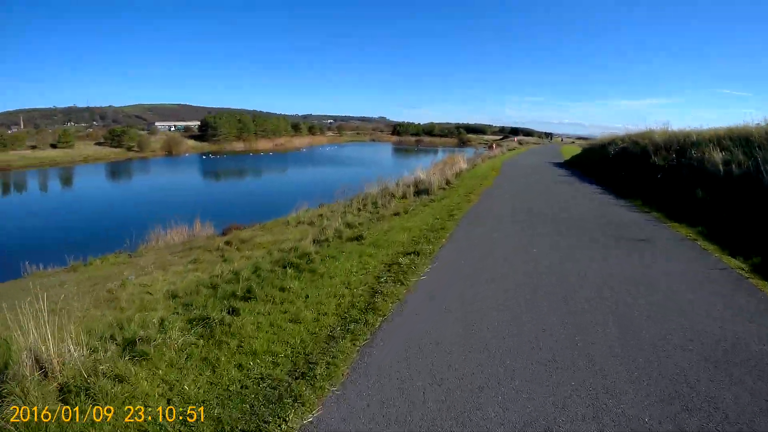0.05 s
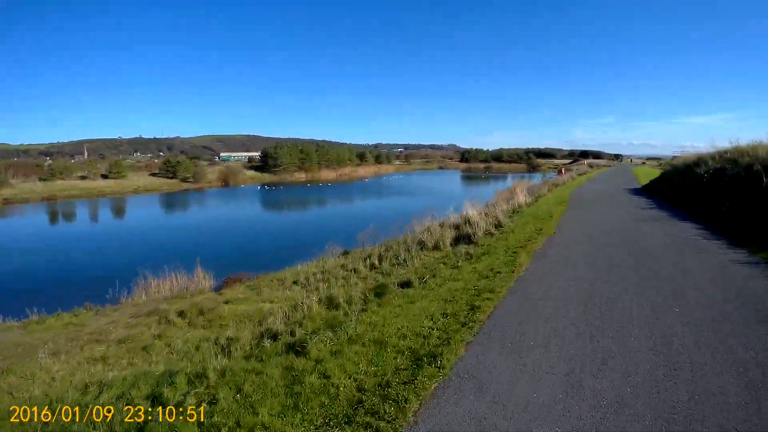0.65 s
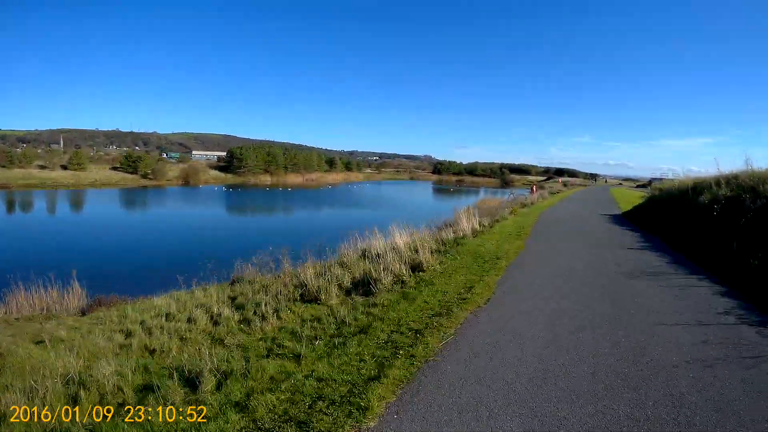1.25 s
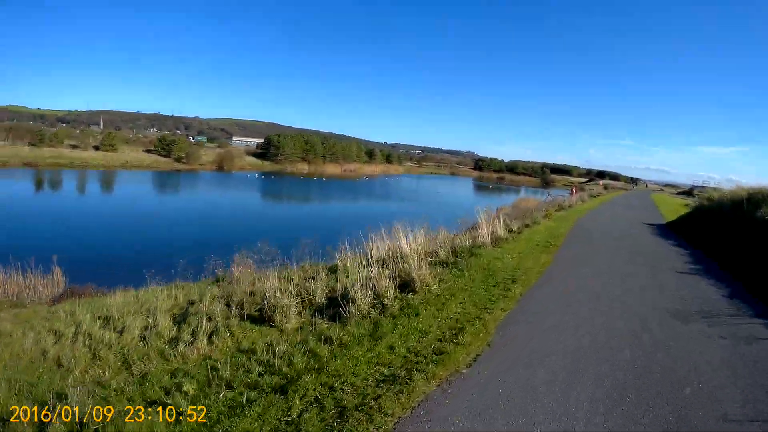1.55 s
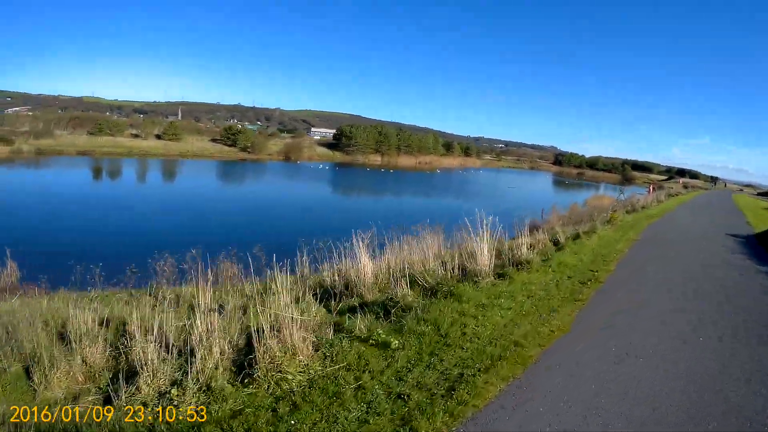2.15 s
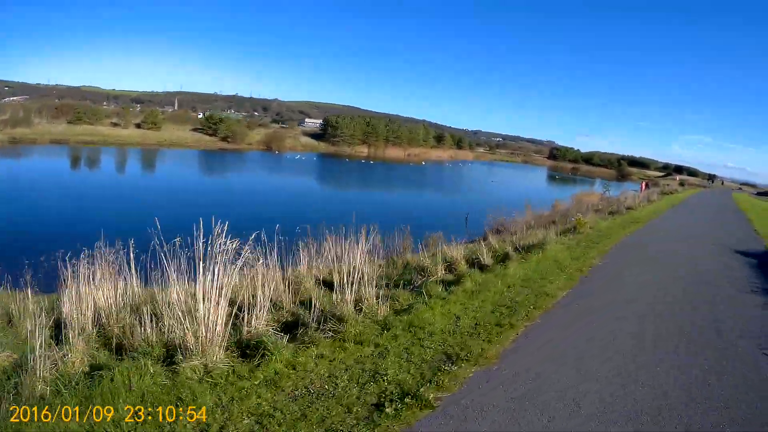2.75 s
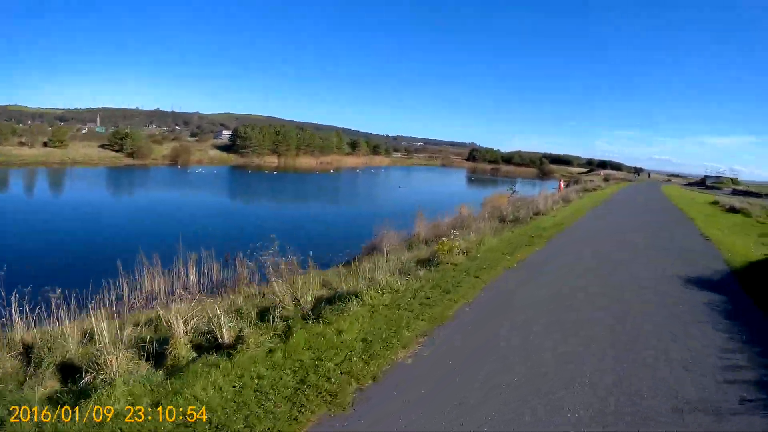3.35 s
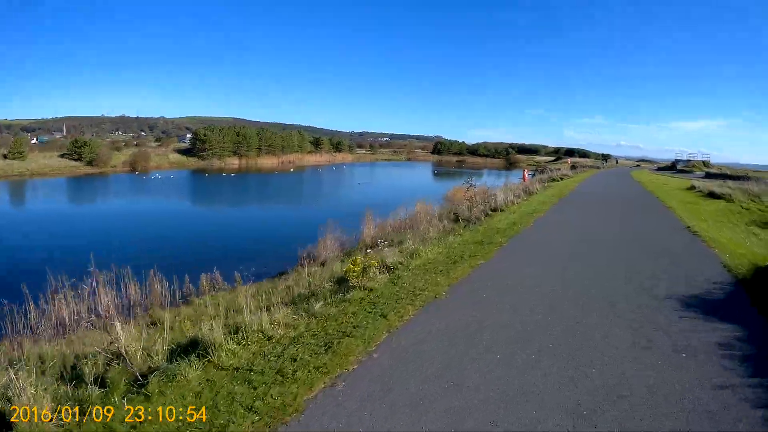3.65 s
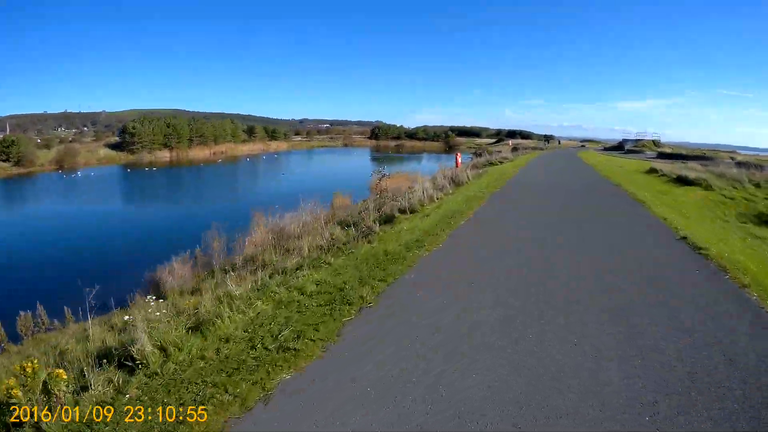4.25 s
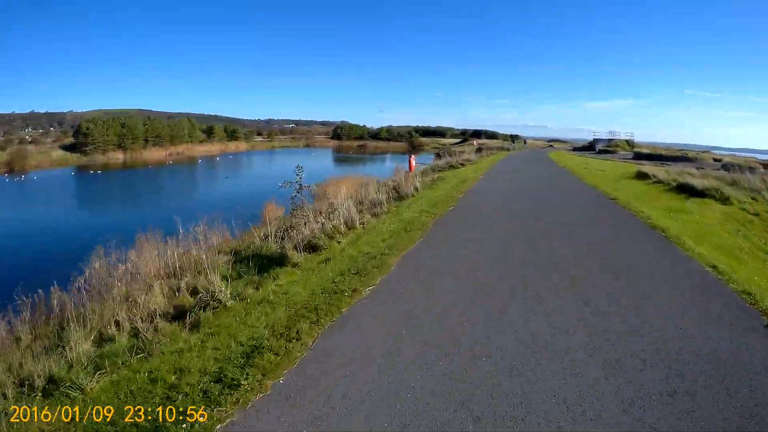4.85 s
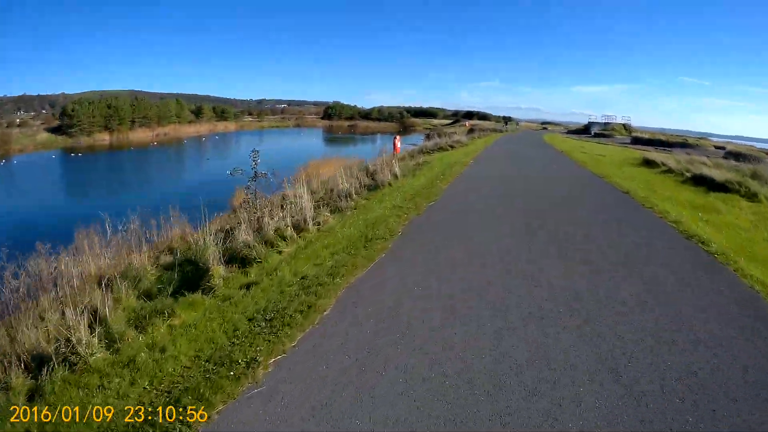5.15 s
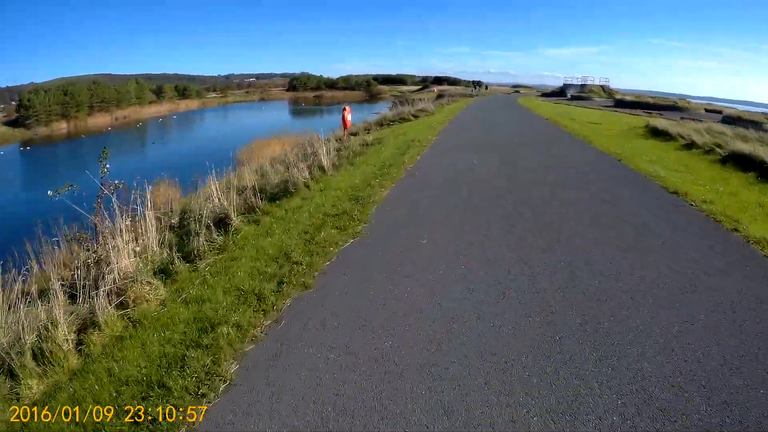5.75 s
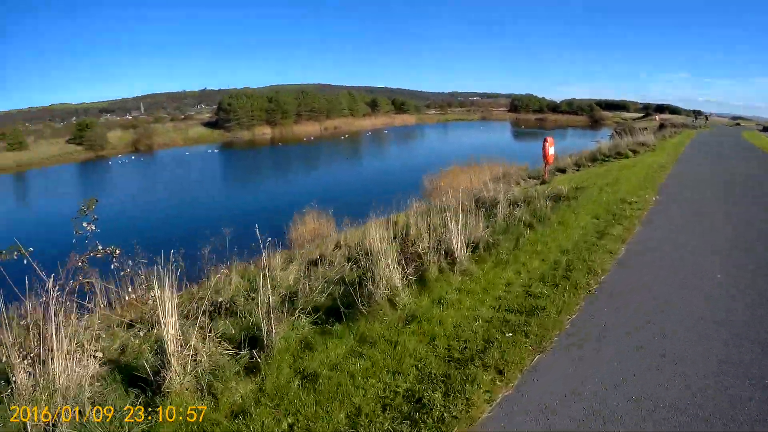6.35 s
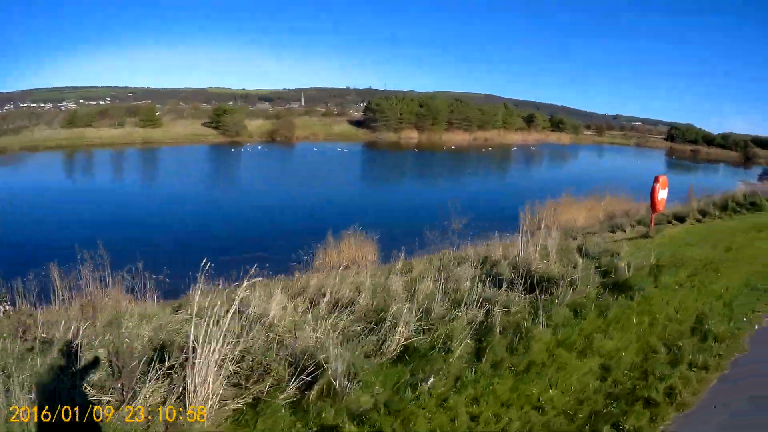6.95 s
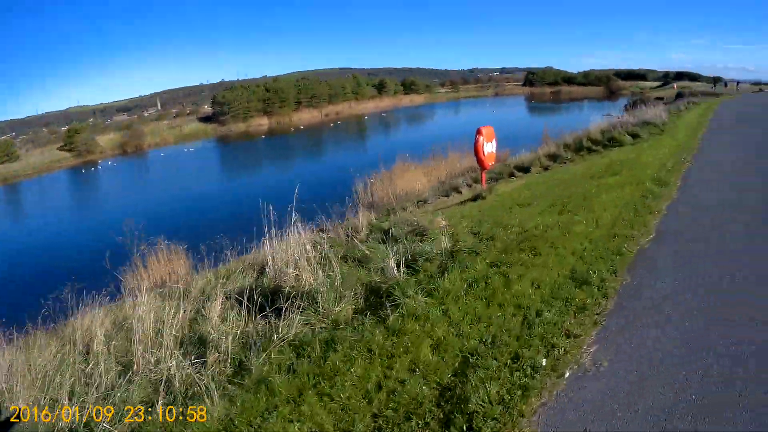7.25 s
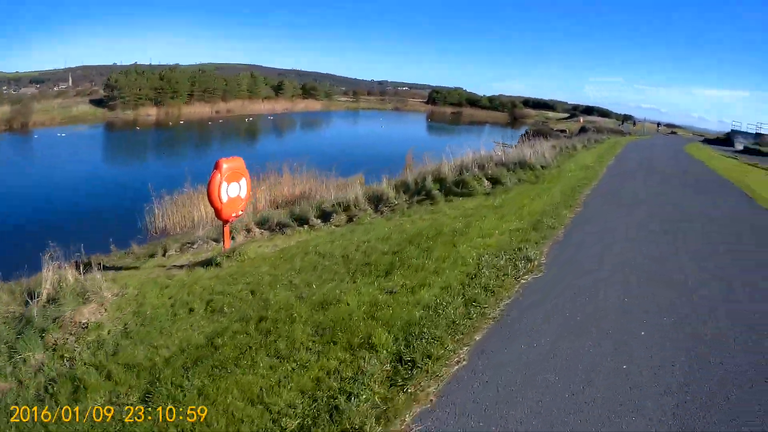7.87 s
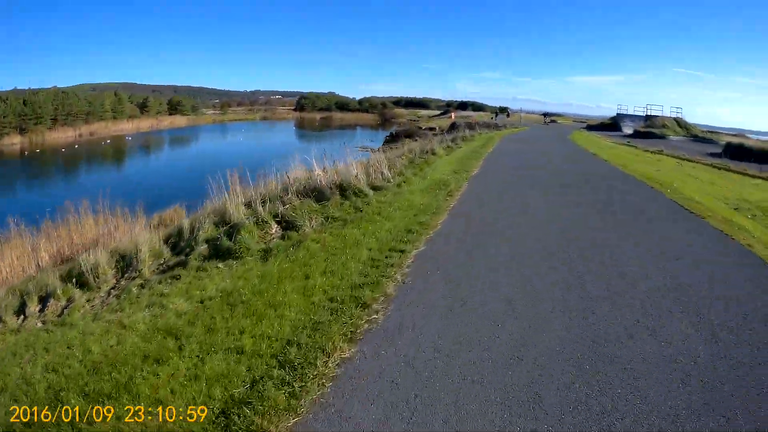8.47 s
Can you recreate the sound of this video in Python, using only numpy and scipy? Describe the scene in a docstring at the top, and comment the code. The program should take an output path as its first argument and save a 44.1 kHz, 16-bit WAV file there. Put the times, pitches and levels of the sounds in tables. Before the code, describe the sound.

Gusty headwind rumbles and thumps on a handheld microphone as an electric skateboard rolls along a paved path in the open. The buffeting is strongest about two to three seconds in and again around seven seconds, with lighter air between and at the close. Underneath, the wheels keep an even roar and thin hiss on the asphalt, with a faint ringing from the drive and occasional small ticks of flicked grit.

```python
"""An electric skateboard cruises along asphalt, heard at a microphone in the rider's hand.
Random impacts of the wheels on stones excite the deck into a steady roar and the treads into a hiss.
The drive and trucks ring faintly at their resonances, and flicked grit ticks.
Gusts of headwind carry eddies past the microphone: their pressure makes a rumble that brightens
as it strengthens, and single large vortices thump."""
import sys
import numpy as np
from scipy import signal
from scipy.fft import rfft, irfft, next_fast_len
from scipy.io import wavfile
from scipy.ndimage import uniform_filter1d

SR = 44100
rng = np.random.default_rng(int(sys.argv[2]) if len(sys.argv) > 2 else 0)


def materialize(psi):
    """Save the field psi as 16-bit PCM at rate SR to the path in sys.argv[1].

    A 1-D psi becomes a single channel; in a 2-D psi each row is a channel.
    """
    bounded = np.clip(np.atleast_2d(psi).T, -1, 1)
    quanta = np.round(bounded * 32767).astype(np.int16)
    wavfile.write(sys.argv[1], SR, quanta)


N = 384111
TIME = np.arange(N) / SR

# Spectra of the wheels and deck, and of the treads on asphalt: frequency_hz, relative_density_db
ROAR_SPECTRUM = [(30, -11.5), (120, -8), (290, -1.5), (400, 1), (530, -0.5), (590, -10), (640, -10),
                 (690, -9.5), (740, -9), (850, -11), (1000, -11), (1095, -13), (1170, -28), (1500, -24),
                 (1950, -25), (2400, -36), (3300, -65.5)]
HISS_SPECTRUM = [(1000, -13), (2200, -0.5), (2850, 1), (3300, -3.5), (3700, 2), (4200, -1), (4500, 0),
                 (4850, -4), (5200, -6), (5900, -12.5), (6600, -12), (7100, -17), (7900, -15.5),
                 (8700, -20), (12500, -20.5), (14500, -30)]
# Hiss as the microphone turns toward and away from the wheels: time_s, base_level_db, treble_lift_db
HISS_CONTOUR = [(0, -68.5, -1.5), (1.6, -69, -3.5), (2.6, -70, -2), (4.3, -69, -1.5), (6.4, -69.3, 0.5),
                (7.3, -69, 2), (7.9, -69.5, 2), (8.71, -68.5, 1)]
# Resonances of the drive and trucks: pitch_hz, width_hz, level_db
DRIVE_MODES = [(468, 35, -59), (931.5, 38, -60.5), (1744, 90, -70.5)]
# Grit flicked by the wheels: start_s, relative_peak_db, low_hz, high_hz
GRIT_TICKS = [(.553, -50.5, 2600, 4900), (1.295, -60, 2200, 5000), (2.394, -56.5, 3800, 7600),
              (2.629, -58, 2800, 6100), (2.709, -62, 3500, 8000), (4.422, -59, 3780, 13000),
              (4.495, -63, 4000, 8400), (5.219, -58, 3900, 5500), (6.1102, -67, 9500, 12800),
              (6.111, -44, 1000, 2900), (8.412, -57, 2410, 4500)]

# Headwind, varying with the breeze and the microphone's heading: time_s, strength_db
HEADWIND_CONTOUR = [(0, -36.5), (.18, -40), (.61, -31), (.87, -40.5), (1.46, -35.5), (1.65, -38),
                    (1.97, -29.5), (2.9, -29), (2.96, -33), (3.84, -33), (4.2, -40), (4.66, -35),
                    (4.84, -40.5), (6.25, -42), (6.8, -26.5), (7.15, -29), (7.34, -34), (7.6, -34.5),
                    (8.1, -41), (8.71, -43)]
# Short gusts on top of it: start_s, length_s, strength_db, extra_turbulence_db
WIND_GUSTS = [(0.285, 0.18, -32.5, -1), (0.406, 0.065, -26.5, -3.5), (0.568, .03, -31.5, 2.5),
              (0.766, 0.029, -30.5, -4), (0.982, 0.08, -35.5, -2), (1.176, 0.13, -31.5, -0.5),
              (1.477, 0.14, -32, -0.5), (1.874, 0.046, -26, -4), (2.247, 0.039, -27.5, -4),
              (2.42, 0.071, -28, -6), (2.562, 0.12, -30, 0.5), (2.72, 0.046, -26, 1), (2.77, 0.076, -27, 0),
              (3.083, 0.094, -28, -0.5), (3.165, 0.081, -28, -3.5), (3.258, 0.12, -44, 4),
              (3.695, 0.057, -30.5, -4), (3.886, 0.069, -31, -11), (4.287, 0.098, -34, -6),
              (4.443, 0.071, -32.5, -6), (4.59, 0.076, -32.5, -2), (4.707, 0.1, -33, -3.5),
              (4.94, 0.04, -40, -12), (5.865, 0.11, -38, -10), (6.047, 0.13, -35.5, -1.5),
              (6.444, 0.041, -29, -1), (6.538, 0.12, -34.5, -0.5), (6.745, 0.022, -29, -0.5),
              (6.987, 0.036, -35, 3.5), (7.074, 0.096, -28, -1.5), (7.177, 0.1, -36.5, 2),
              (7.426, 0.064, -27.5, -4), (7.533, 0.084, -33.5, -4), (7.776, 0.22, -40, 0.5)]
# Spectra of slow eddies, fast eddies, fine turbulence and vortex puffs: frequency_hz, relative_density_db
LIGHT_AIR_SPECTRUM = [(8, -16.5), (22, -2), (55, 0), (115, -3), (180, -9), (300, -17.5), (500, -29.5),
                      (1000, -39), (3000, -79.5)]
HARD_GUST_SPECTRUM = [(8, -28), (22, -5), (60, 2), (110, 2), (150, -4.5), (200, -4.5), (300, -11.5),
                      (500, -20.5), (1000, -37), (2000, -67.5), (5000, -93.5)]
TURBULENCE_SPECTRUM = [(80, -21), (250, -4.5), (480, -3.5), (700, -6.5), (1100, -11.5), (1700, -16.5),
                       (2500, -29.5), (3500, -41.5), (6000, -58.5), (12000, -81)]
PUFF_SPECTRUM = [(150, -10), (450, 5), (1000, -6.5), (1700, -13), (2600, -32), (5000, -58), (10000, -85.5)]
# Large eddies striking the microphone: centre_s, relative_peak_db, half_width_s, puff_level_db
VORTICES = [(0.592, -13.5, 0.0036, -49), (0.648, -16, 0.0035, -55), (1.89, -14.5, 0.0015, -51),
            (1.918, -14, 0.0018, -37), (1.961, -17.5, .0018, -45), (2.024, -14.5, 0.0017, -45),
            (2.078, -12.5, 0.0011, -46), (2.264, -16.5, 0.0012, -37), (2.268, -13, 0.0014, -36),
            (2.28, -16.5, 0.0014, -45), (2.442, -22, 0.0008, -35), (2.456, -19.5, 0.0031, -48),
            (2.673, -11.5, 0.0016, -45), (2.733, -17, 0.0013, -35), (3.104, -13, 0.0019, -38),
            (3.125, -17.5, 0.0012, -35.5), (3.146, -13, 0.0011, -41), (3.308, -16.5, .0025, -56),
            (3.447, -17.5, 0.0026, -45), (4.609, -15, 0.0026, -49), (6.075, -20.5, .0016, -52),
            (6.091, -22.5, 0.00091, -46), (6.958, -14, 0.0014, -40), (7.008, -14.5, 0.002, -54),
            (7.107, -15.5, 0.0031, -45), (7.245, -18, 0.00066, -37)]


def wheel_roar(level_db=-43.5):
    """Impact excitation: stones shake the wheels and deck; constant speed keeps the level steady."""
    return colour(stone_impacts(per_s=9000, spread_db=1.5), ROAR_SPECTRUM) * amp(level_db)


def tread_hiss(flicker_db=0.5, treble_hz=6100):
    """Directivity: the treads' contact noise changes in level and treble as the microphone turns."""
    base_db, lift_db = curves(HISS_CONTOUR)
    hiss = colour(stone_impacts(per_s=20000, spread_db=1.4), HISS_SPECTRUM)
    hiss *= amp(base_db + flicker_db * wander(25))
    treble = signal.lfilter(*signal.iirpeak(treble_hz, Q=3, fs=SR), hiss)
    return hiss + treble * (amp(lift_db) - 1)


def stone_impacts(per_s, spread_db):
    """Shot noise: a wheel meets the stones of the asphalt at random instants, a few of them hard."""
    size = amp(spread_db * np.minimum(rng.exponential(1, N), 5))
    return size * rng.standard_normal(N) * (rng.random(N) < per_s / SR)


def drive_ring():
    """Resonance: under random forcing, each mode of the drive and trucks sings in a narrow band."""
    ring = np.zeros(N)
    for pitch_hz, width_hz, level_db in DRIVE_MODES:
        q = pitch_hz / width_hz
        mode = signal.lfilter(*signal.iirpeak(pitch_hz, q, fs=SR), rng.standard_normal(N))
        mode = signal.lfilter(*signal.iirpeak(pitch_hz, q / 2, fs=SR), mode)  # steeper skirts
        ring += amp(level_db) * unit(mode)
    return ring


def grit_ticks(gain_db=1, decay_s=0.0011):
    """Impulsive transients: grit snaps from under the wheels in brief, hence broadband, bursts."""
    out = np.zeros(N)
    t = np.arange(600) / SR
    for start_s, peak_db, low_hz, high_hz in GRIT_TICKS:
        snap = rng.standard_normal(len(t)) * np.exp(-t / decay_s)
        snap = signal.lfilter(*signal.butter(3, [low_hz, high_hz], "band", fs=SR), snap)
        out[round(start_s * SR):][:len(t)] += amp(peak_db + gain_db) * snap / abs(snap).max()
    return out


def wind_noise(rumble_gain_db=0.28, fine_gain_db=-49.5, fine_growth=0.94, crossover_db=-30.5):
    """Turbulent pressure: eddies rumble and shed finer ones; faster passage raises their frequencies."""
    strength_db, extra_db = wind_strength()
    strength_db += 0.83 * wander(16)  # the wind throbs
    excess_db = strength_db - crossover_db
    hardness = 0.5 + 0.5 * np.tanh(excess_db / 5)  # 0 in light air, 1 in a hard gust
    air = rng.standard_normal(N) * amp(1.34 * wander(40))  # the air arrives in separate lumps
    eddies = (1 - hardness) * colour(air, LIGHT_AIR_SPECTRUM) + hardness * colour(air, HARD_GUST_SPECTRUM)
    eddies = steadied(eddies, size=2800)
    rumble = eddies * amp(strength_db + rumble_gain_db + vortex_sweep_db())
    pressure = unit(uniform_filter1d(abs(eddies), size=120))
    puffs = unit((1.6 + pressure) * amp(-0.9 * wander(45)))  # fine turbulence pulses with the eddies
    fine = steadied(colour(rng.standard_normal(N) * puffs, TURBULENCE_SPECTRUM), size=2400)
    return rumble + fine * amp(fine_gain_db + fine_growth * excess_db + extra_db)


def wind_strength(attack_s=0.013, release_s=0.018):
    """Incoherent addition: headwind and gusts sum in power. Gives strength and extra turbulence in dB."""
    headwind_db, = curves(HEADWIND_CONTOUR)
    power, extra_db = amp(headwind_db) ** 2, 0
    for start_s, length_s, strength_db, turbulence_db in WIND_GUSTS:
        rise = np.clip((TIME - start_s) / attack_s, 0, 1)
        fall = np.exp(-np.clip(TIME - start_s - length_s, 0, 1) / release_s)
        power += (amp(strength_db) * rise * fall) ** 2
        extra_db += turbulence_db * rise * fall
    return 10 * np.log10(power), extra_db


def vortex_thumps(gain_db=-1, puff_s=0.0026):
    """Convected vortices: each passes as a pressure peak between shallow troughs, with a turbulent puff."""
    out = np.zeros(N)
    turbulence = colour(rng.standard_normal(N), PUFF_SPECTRUM)
    for centre_s, peak_db, half_width_s, puff_db in VORTICES:
        near = abs(TIME - centre_s) < 20 * half_width_s
        t = TIME[near] - centre_s
        distance_sq = (t / half_width_s) ** 2 / 2
        thump = amp(peak_db + gain_db) * (1 - distance_sq) / (1 + distance_sq) ** 2
        puff = amp(puff_db) * unit(turbulence[near]) * np.exp(-(t / puff_s) ** 2)
        out[near] += (thump + puff) * np.hanning(len(t))
    return out


def vortex_sweep_db(dip_db=-4.5, reach_half_widths=4):
    """Advection: a large vortex sweeps smaller eddies aside, so the rumble dips around it."""
    return sum(dip_db / (1 + ((TIME - centre_s) / (reach_half_widths * half_width_s)) ** 2)
               for centre_s, _, half_width_s, _ in VORTICES)


def amp(db):
    """The decibel scale: amplitude grows tenfold every 20 dB."""
    return 10 ** (np.asarray(db) / 20)


def unit(x):
    """Normalisation to rms 1."""
    return x / np.sqrt(np.mean(x ** 2) + 1e-20)


def curves(rows):
    """Linear interpolation of each column of a timed table at every sample."""
    time_s, *columns = np.transpose(rows)
    return [np.interp(TIME, time_s, column) for column in columns]


def colour(x, spectrum):
    """Spectral shaping of x by a table of frequency_hz, relative_density_db; rms 1."""
    hz, db = np.transpose(spectrum)
    size = next_fast_len(N)
    bins_hz = np.fft.rfftfreq(size, 1 / SR)
    gain = amp(np.interp(np.log(bins_hz + 1), np.log(hz), db))
    return unit(irfft(rfft(x, size) * gain, size)[:N])


def wander(cutoff_hz):
    """Random modulation: low-passed noise of rms 1."""
    size = next_fast_len(N)
    bins_hz = np.fft.rfftfreq(size, 1 / SR)
    spectrum = rfft(rng.standard_normal(size)) / (1 + (bins_hz / cutoff_hz) ** 4)
    return unit(irfft(spectrum, size)[:N])


def steadied(x, size):
    """Envelope normalisation: holds the rms near 1 over stretches of about size samples."""
    return x / np.sqrt(uniform_filter1d(uniform_filter1d(x ** 2, size), size) + 1e-9)


def scene():
    """Superposition: the pressures of board and wind add at one microphone."""
    board = wheel_roar() + tread_hiss() + drive_ring() + grit_ticks()
    return (board + wind_noise() + vortex_thumps())[None]


def record(dry):
    """Band limiting: the microphone's chain passes sound only up to a treble cutoff."""
    low_pass = signal.firwin(511, cutoff=15100, window=("kaiser", 9), fs=SR)
    return signal.oaconvolve(dry, low_pass[None], "same")


dry = scene()
out = record(dry)
materialize(out)
```